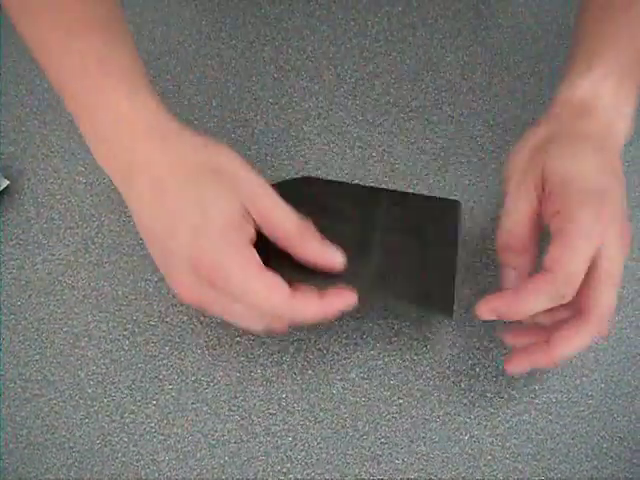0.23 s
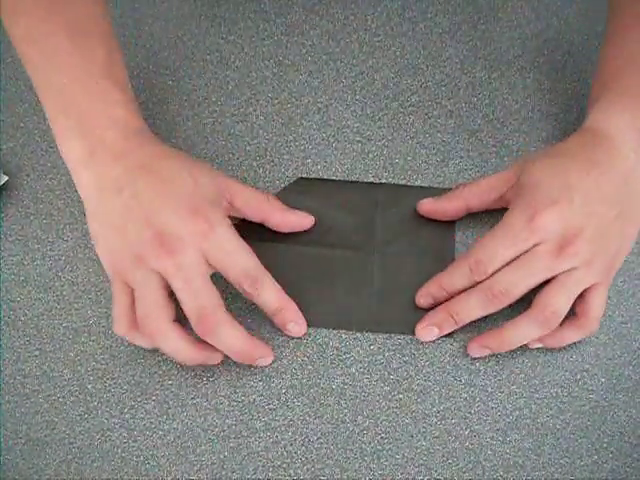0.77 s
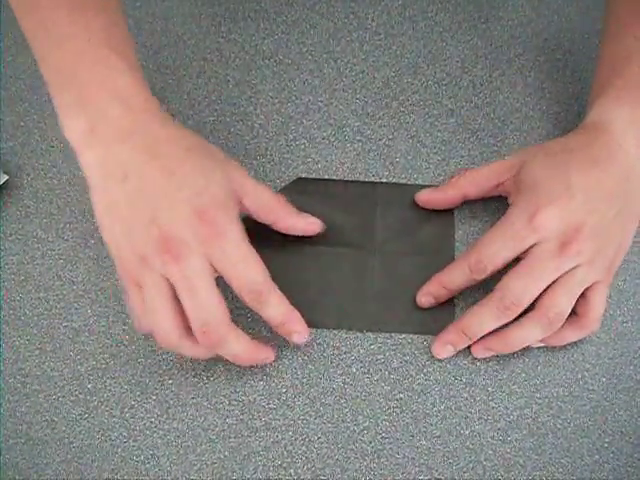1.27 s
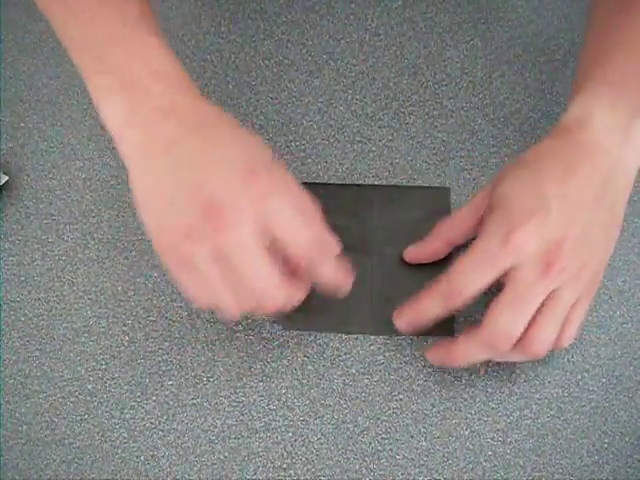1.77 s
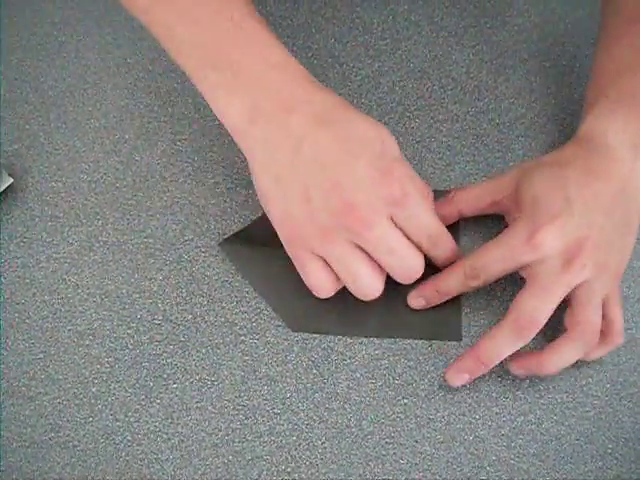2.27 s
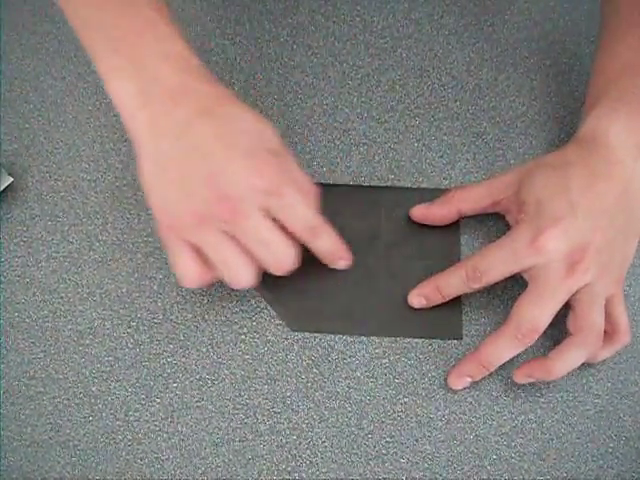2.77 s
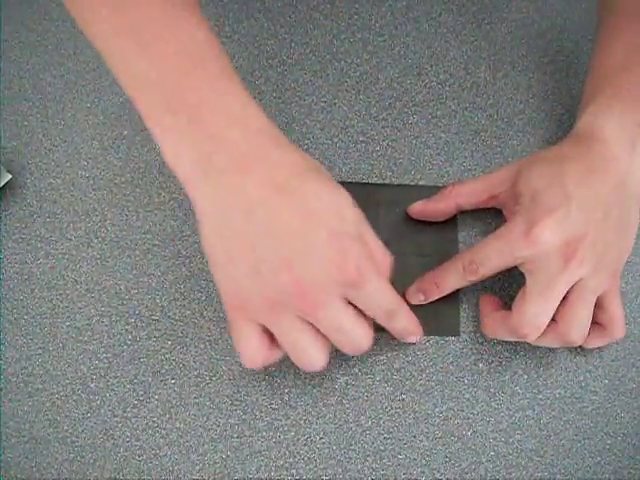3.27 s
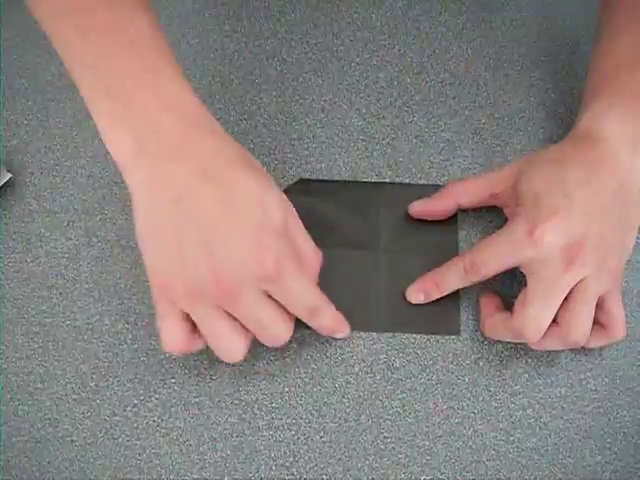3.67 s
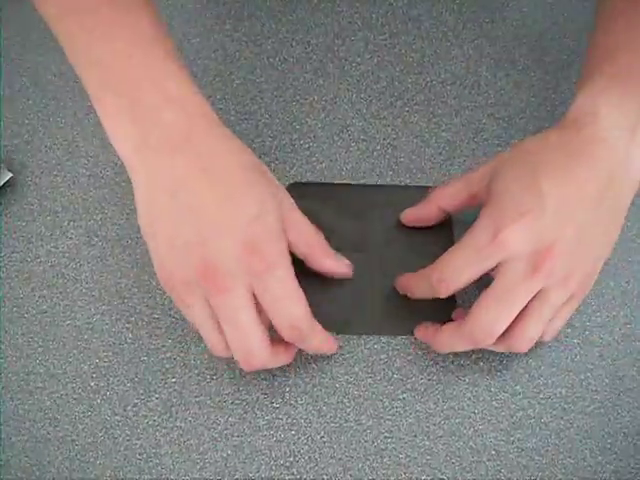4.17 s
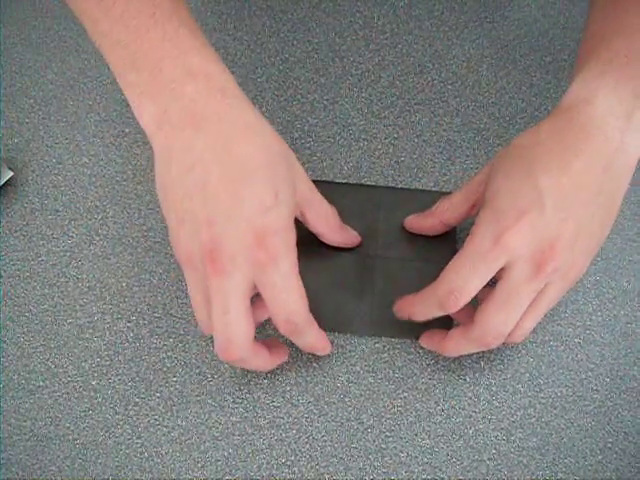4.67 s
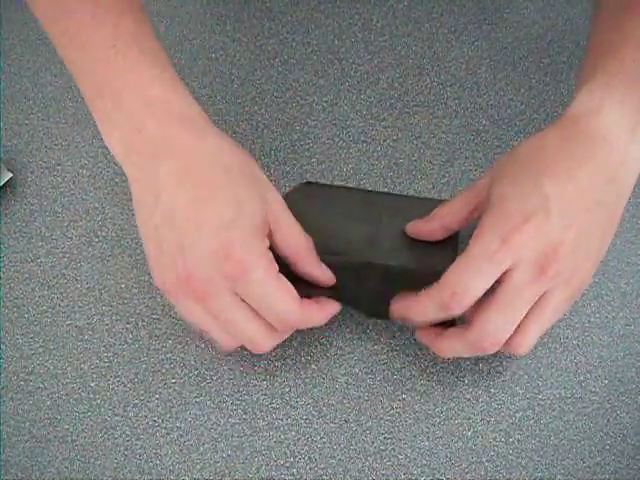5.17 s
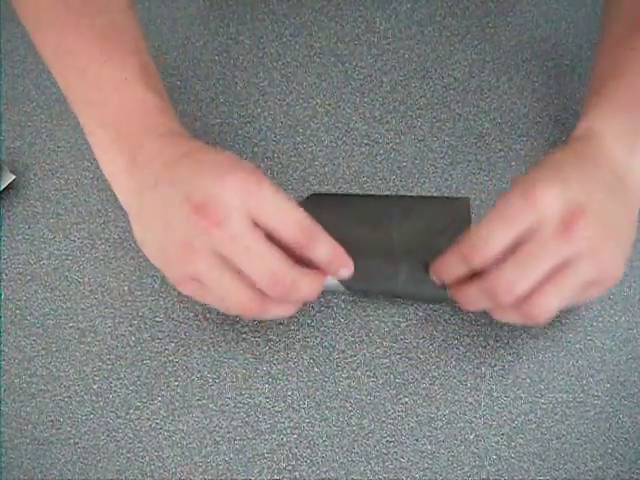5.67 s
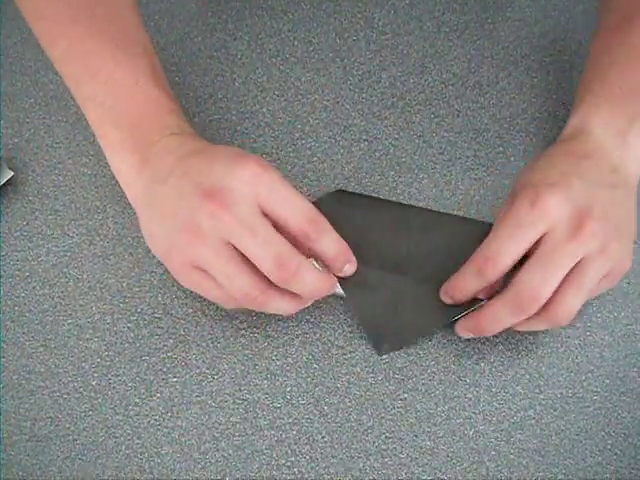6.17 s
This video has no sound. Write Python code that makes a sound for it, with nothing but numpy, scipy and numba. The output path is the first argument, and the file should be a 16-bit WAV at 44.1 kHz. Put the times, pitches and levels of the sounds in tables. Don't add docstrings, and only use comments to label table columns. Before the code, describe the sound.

Close, coarse small-camera sound in a quiet bare room: constant hiss with a low electrical buzz coming and going. Paper rustles and snaps, is pressed flat in a swelling crackle with a clipped, explosive peak and a short echo, then there are only faint finger slides and ticks. Finally, crisp crinkles and soft rustles return as it is folded.

```python
import sys
import numpy as np
from scipy import signal
from scipy.fft import rfft, irfft
from scipy.io import wavfile
from scipy.ndimage import uniform_filter1d
from numba import njit

SR = 44100
rng = np.random.default_rng(int(sys.argv[2]) if len(sys.argv) > 2 else 0)


def generate_wav(sig):
    pcm = np.round(np.clip(np.atleast_2d(sig).T, -1, 1) * 32767).astype(np.int16)
    wavfile.write(sys.argv[1], SR, pcm)


def magnitude_from_level(level_db):
    exponent = np.asarray(level_db, float) / 20
    return 10 ** exponent


N = 283210
TIME_S = np.arange(N) / SR

# frequency_hz, density_db
HISS_SPECTRUM = [(88, -34), (150, -4.5), (195, -5), (612, -11), (668, -12), (1060, -13), (1140, -14.5),
                 (4800, -19.5), (6240, -53), (10600, -120)]
# start_s, busy_s, trailing_s, buzz_db
CARD_WRITES = [
    (-0.45, 0.31, 0.25, -34.5),
    (0.569, 0.3, 0.22, -35),
    (1.57, 0.3, 0.21, -34.5),
    (2.639, 0.23, 0.32, -35.5),
    (3.53, 0.29, 0.2, -33.5),
    (4.55, 0.345, 0.18, -34.5),
    (5.54, 0.12, 0.17, -43.5),
    (6.28, 0.1, 0.063, -47),
]
# start_s, length_s, level_db, centre_hz, width_hz
STROKES = [(0.0, 0.069, -33, 3370, 350), (0.098, 0.011, -23, 3170, 900), (0.112, 0.063, -38, 3000, 1300),
           (0.28, 0.12, -38.5, 2500, 1200), (0.374, 0.049, -38.5, 2740, 1200),
           (0.443, 0.027, -40, 3950, 596), (0.467, 0.059, -39.5, 3430, 1305),
           (0.632, 0.06, -45.5, 3320, 1290), (1.793, 0.24, -53, 2519, 1500), (2.0, 0.11, -43.5, 3460, 1200),
           (2.747, 0.32, -50, 2930, 1700), (4.202, 0.15, -43, 3630, 1203), (4.451, 0.25, -48, 3520, 1250),
           (4.749, 0.089, -43.5, 3730, 900), (4.814, 0.03, -40.5, 2600, 799),
           (4.873, 0.11, -42, 3030, 1300), (4.962, 0.06, -40.5, 2750, 1100), (5.177, 0.052, -38, 2330, 590),
           (5.315, 0.056, -36.5, 3150, 960), (5.364, 0.078, -41, 2850, 1300),
           (5.448, 0.24, -42.5, 3360, 1210), (5.806, 0.076, -41, 4160, 705),
           (5.882, 0.19, -46.5, 2900, 1500), (6.162, 0.078, -46, 3700, 950)]
# end_s, level_db, centre_hz, width_hz
LANDING = (0.23, -41.5, 1496, 904)
# start_s, peak_db, panel_hz, dull_db, spread_ms
CREASE_SNAPS = [(0.0995, -13, 3220, -3.5, 1.2), (0.1485, -28, 3120, 0, 1.6), (0.291, -11.5, 3580, 1.5, 0.7),
                (0.3189, -15.5, 2730, -4, 4.6), (0.3243, -11, 2900, -20, 0.58),
                (0.3841, -14, 2120, 9, 0.33), (0.4883, -19, 4000, -3, 0.62),
                (0.516, -21, 2530, -13.5, 0.55), (0.53, -19.5, 3900, -5.5, 0.5),
                (1.807, -20, 3980, -9.5, 1.6), (1.8088, -12, 5030, -4, 1), (1.991, -17, 3350, -18, 1),
                (2.044, -10.5, 4220, -20, 0.47), (2.048, -17, 3960, -5.5, 0.72),
                (3.0255, -15, 3910, -9, 0.58), (4.9314, -12.5, 2940, -3, 0.72),
                (4.9401, -14, 3860, -6, 0.41), (5.1794, -18, 2990, -9, 0.29),
                (5.1925, -15, 3120, 0.5, 0.95), (5.2144, -16, 2960, -6, 0.72),
                (5.3022, -7, 3080, -13, 0.49), (5.3713, -12.5, 4300, 1, 0.44),
                (5.58, -18.5, 4160, -6, 1.18), (6.0676, -25.5, 2560, -1, 0.814)]
# start_s, peak_db, panel_hz
FAINTER_SNAPS = [(0.452, -22.5, 3830), (0.6317, -29, 3360), (0.6626, -23.5, 4500), (1.927, -23, 2900),
                 (3.596, -28, 3840), (3.85, -33, 3620), (3.977, -28.5, 3820), (4.224, -33, 3680),
                 (4.273, -23, 4020), (4.5514, -26.5, 3980), (4.5638, -25, 3840), (4.603, -23, 3920),
                 (4.6262, -26, 3920), (4.6587, -27.5, 3340), (4.67, -24.5, 4000), (4.7526, -27.5, 4020),
                 (4.7862, -21.5, 3700), (4.992, -24.5, 2570), (5.454, -25, 2496), (5.8462, -26, 3960),
                 (5.8647, -25, 4050), (5.9886, -26.5, 2800), (6.1642, -26, 4100), (6.171, -26, 4140),
                 (6.179, -22, 4050), (6.2239, -22, 4150), (6.2593, -30, 3030)]
# start_s, hold_s, effort_db, dull_share_db, fade_db_per_s
PUSHES = [
    (0.912, 0.12, -31.5, -1.5, 59),
    (1.115, 0.19, -27.5, 0.6, 248.5),
    (1.259, 0.024, -11, 2, 68.5),
]
# start_s, peak_db
HARD_SLIPS = [
    (1.2868, -8),
    (1.2998, -12),
    (1.3062, 0.4),
    (1.3187, -7),
    (1.3494, -8),
    (1.3645, -10),
]
# centre_hz, width_hz, gain_db
DULL_PANELS = [(101, 48, -10), (269, 39, -7), (610, 270, -14.5), (1500, 670, -0.5), (2193, 630, 0.5)]
# centre_hz, width_hz, gain_db
BRIGHT_PANELS = [(3150, 1070, -4.5), (3550, 500, 6.5), (3970, 1570, -0.5)]


def level(x, db):
    return x * magnitude_from_level(db) / np.sqrt(np.mean(x ** 2))


def ramp(start_s, length_s):
    return np.clip((TIME_S - start_s) / length_s, 0, 1)


def walk(rate_hz):
    hold = int(SR / rate_hz)
    held = np.repeat(rng.standard_normal(N // hold + 1), hold)
    return 1.2 * uniform_filter1d(held, hold)[:N]


def slips(scatter_db, size=N):
    strength = np.minimum(rng.exponential(size=size // 20 + 1), 4.5)
    return rng.standard_normal(size) * magnitude_from_level(scatter_db * np.repeat(strength, 20)[:size])


def ring(x, hz, width_hz):
    return signal.lfilter(*signal.iirpeak(hz, hz / width_hz, fs=SR), x)


def body(x, modes):
    total = 0
    for k, (hz, width_hz, db) in enumerate(modes):
        total = total + (-1) ** k * magnitude_from_level(db) * ring(x, hz, width_hz)
    return total


@njit
def sweep(x, hz, width_hz):
    y, band, low = np.empty(len(x)), 0., 0.
    for i in range(len(x)):
        g = np.tan(np.pi * hz[i] / SR)
        damping = width_hz[i] / hz[i]
        v = (band + g * (x[i] - low)) / (1 + g * (g + damping))
        band = 2 * v - band
        low = low + 2 * g * v
        y[i] = damping * v
    return y


def amplifier_hiss():
    f = np.maximum(np.fft.rfftfreq(N, 1 / SR), 1)
    hz, db = np.transpose(HISS_SPECTRUM[1:-2])
    shape = magnitude_from_level(np.interp(np.log(f), np.log(hz), db)) * np.minimum(f / 40, 1)
    noise = irfft(rfft(rng.standard_normal(N)) * shape, N)
    return level(noise, -37.5) * magnitude_from_level(0.48 * walk(5))


def card_load():
    idle_hz, busy_hz, edge_s = 92.1, 96.5, 0.09
    lurch_s, trail_db = 0.037, -6
    buzz, busy, wander = magnitude_from_level(-63), 0, magnitude_from_level(-45)
    for start, hold, trail, db in CARD_WRITES:
        end = start + hold + trail
        on, eased, off = (ramp(s - edge_s / 2, edge_s) for s in (start, start + hold, end))
        buzz = buzz + magnitude_from_level(db) * (on - eased + magnitude_from_level(trail_db) * (eased - off))
        busy = busy + on - eased
        wander = wander + magnitude_from_level(db - 13) * (on - off)
        for s in (start, end):
            wander = wander + magnitude_from_level(db - 11) * np.exp(-((TIME_S - s) / lurch_s) ** 2)
    return buzz, idle_hz + (busy_hz - idle_hz) * busy, wander


def camera():
    buzz_gain, buzz_hz, wander_gain = card_load()
    phase = 2 * np.pi * np.cumsum(buzz_hz * (1 + 0.1764 * walk(90))) / SR
    saw = np.sin(phase) + 0.35 * np.sin(2 * phase - .8) + 0.19 * np.sin(3 * phase - 1.6)
    buzz = saw * buzz_gain * magnitude_from_level(1.95 * walk(60))
    steps = np.repeat(rng.standard_normal(N // 900 + 1), 900)[:N]
    steps = uniform_filter1d(steps, 180)
    drift_free = steps - uniform_filter1d(steps, 3500)
    wander = level(drift_free, 2.0) * wander_gain
    return amplifier_hiss() + buzz + wander


def rustle():
    fade_s = 0.044
    gain, hz, width = np.zeros(N), np.full(N, 3000.), np.full(N, 1200.)
    for start, length, db, centre_hz, width_hz in STROKES:
        begun = TIME_S >= start
        fade = np.exp(-np.maximum(TIME_S - start - length, 0) / fade_s)
        gain = np.where(begun, magnitude_from_level(db) * fade, gain)
        hz = np.where(begun, centre_hz, hz)
        width = np.where(begun, width_hz, width)
    gain, hz, width = (uniform_filter1d(v, size=120) for v in (gain, hz, width))
    drive = level(slips(2.3) * magnitude_from_level(1.2 * walk(70)), 0)
    panel = sweep(sweep(drive, hz, 1.7 * width), hz, 2.8 * width)
    return panel * gain * np.sqrt(SR / 2 / width) * magnitude_from_level(-2.0)


def landing():
    end_s, db, centre_hz, width_hz = LANDING
    contact = ring(ring(slips(0.97), centre_hz, width_hz), centre_hz, 2 * width_hz)
    return level(contact, db) * np.clip(1.3 - TIME_S / end_s, 0, 1)


def snap(panel_hz, dull_db, spread_ms, bright_db):
    size = 2048
    shower = slips(2.54, size) * np.exp(-np.arange(size) / SR / (0.0038 * np.sqrt(spread_ms)))
    shower[0] += 5.03 / spread_ms
    glint_db = bright_db + 6.5 + (panel_hz - 4000) / 120
    modes = [(panel_hz, 600, 0), (1950, 700, dull_db), (4100, 1900, bright_db), (5500, 900, glint_db)]
    sound = np.zeros(size)
    for hz, width_hz, db in modes:
        sound += level(ring(ring(shower, hz, width_hz), hz, 1.55 * width_hz), db)
    return sound / np.abs(sound).max()


def snaps():
    out = np.zeros(N)
    rows = [(*row, -0.5) for row in CREASE_SNAPS]
    rows += [(*row, -3, 1.1, 1) for row in FAINTER_SNAPS]
    for start, peak_db, panel_hz, dull_db, spread_ms, bright_db in rows:
        sound = snap(panel_hz, dull_db, spread_ms, bright_db) * magnitude_from_level(peak_db + 2.0)
        i = int(start * SR)
        out[i:i + len(sound)] += sound[:N - i]
    return out


def crackle():
    bright, dull = np.zeros(N), np.zeros(N)
    for start, hold, db, dull_db, fade in PUSHES:
        push = ramp(start, 0.007) ** 2 * magnitude_from_level(db)
        faded_db = fade * np.maximum(TIME_S - start - hold, 0)
        bright += push * magnitude_from_level(-faded_db)
        dull += push * magnitude_from_level(dull_db - 0.93 * faded_db)
    dull *= ramp(PUSHES[0][0], 0.07)
    drive = level(slips(1.56) * magnitude_from_level(1.2 * walk(120)), 0)
    dense = body(drive * dull, DULL_PANELS) + body(drive * bright, BRIGHT_PANELS)
    tick = body(np.eye(1, 512)[0], DULL_PANELS + BRIGHT_PANELS)
    hard = np.zeros(N)
    for start, peak_db in HARD_SLIPS:
        hard[int(start * SR)] = magnitude_from_level(peak_db) / np.abs(tick).max()
    return 0.79 * np.tanh(3.33 * dense) + np.convolve(hard, tick)[:N]


def room(x):
    t60_s, tail_db, first_reflection_s = 0.96, -6.5, .008
    t = np.arange(SR) / SR
    tail = rng.standard_normal(SR) * magnitude_from_level(-60 * t / t60_s) * (t > first_reflection_s)
    tail = tail + 0.46 * ring(tail, 3500, 980)
    tail *= magnitude_from_level(tail_db) / np.sqrt(np.sum(tail ** 2))
    return signal.fftconvolve(x, tail)[:N]


def scene():
    noise = camera()
    near = rustle() + landing() + snaps()
    loud = crackle()
    return (near + loud + room(loud + 0.045 * near) + noise)[None]


def band_limit(x):
    return signal.sosfilt(signal.butter(12, 17400, fs=SR, output="sos"), x)


def record(dry):
    step, bits = 4, 8
    guard = signal.firwin(121, 5150, window=("kaiser", 4.0), fs=SR)
    rounding = (rng.random(N) - .5) / 2 ** (bits - 1)
    sampled = signal.fftconvolve(dry, guard[None], mode="same") + rounding
    kept = step * sampled * (np.arange(N) % step == 0)
    rebuild = signal.firwin(73, 5600, window=("kaiser", 10), fs=SR)
    out = signal.fftconvolve(kept, rebuild[None], mode="same") - .0038
    out = np.clip(out, -.96, .96)
    return band_limit(out)


dry = scene()
out = record(dry)
generate_wav(out)
```